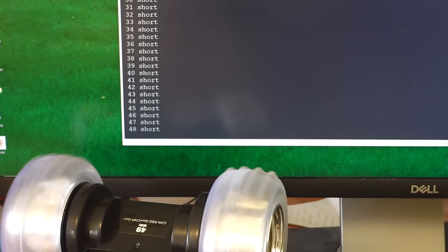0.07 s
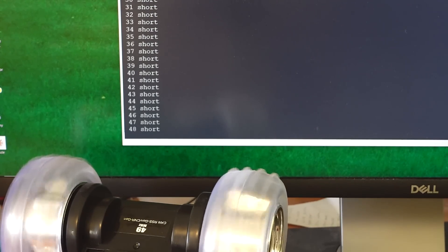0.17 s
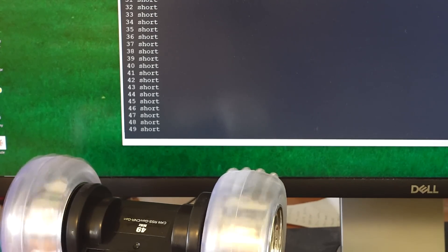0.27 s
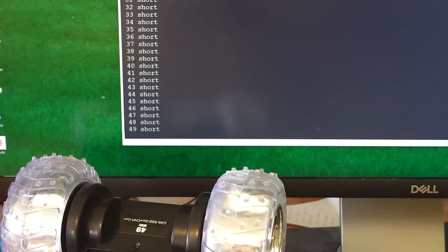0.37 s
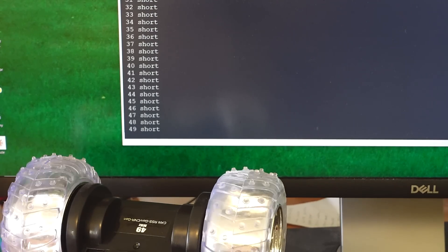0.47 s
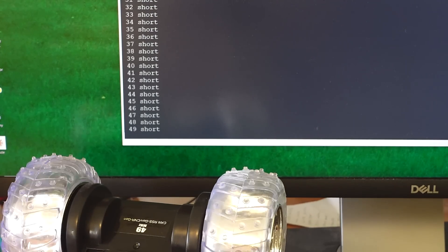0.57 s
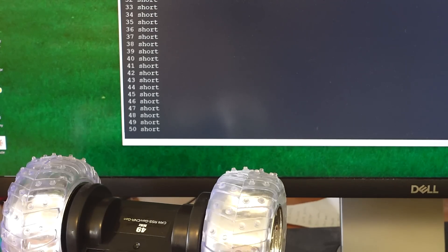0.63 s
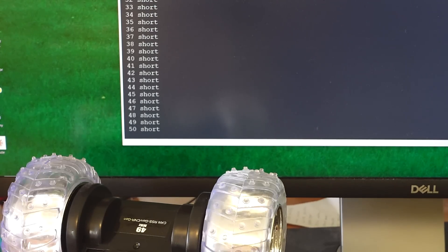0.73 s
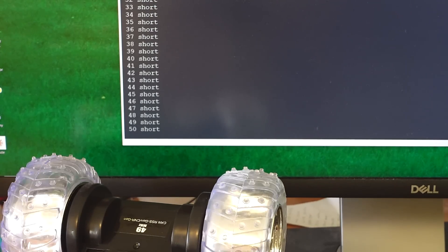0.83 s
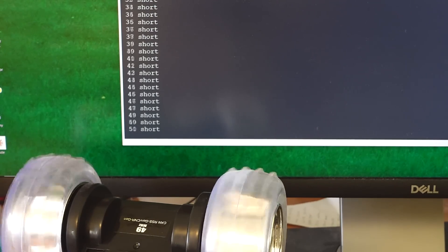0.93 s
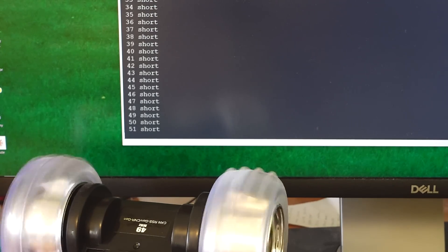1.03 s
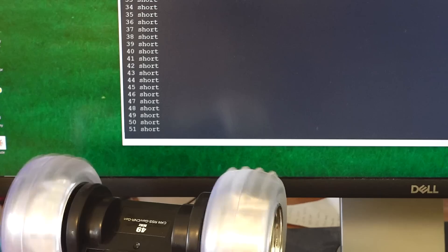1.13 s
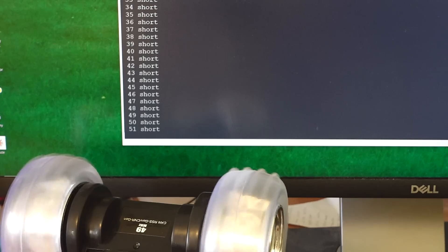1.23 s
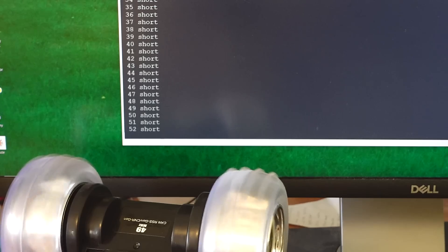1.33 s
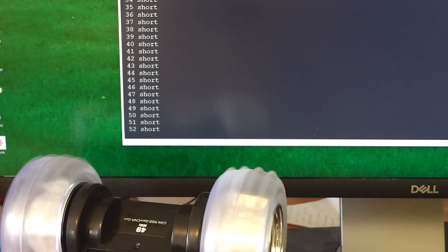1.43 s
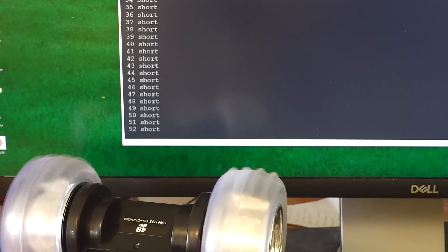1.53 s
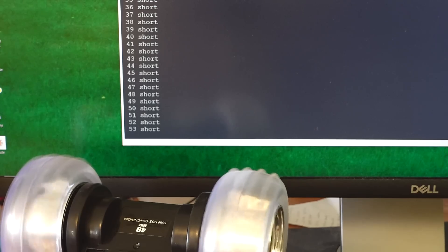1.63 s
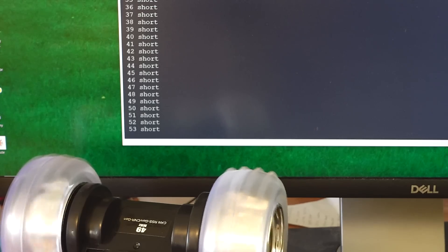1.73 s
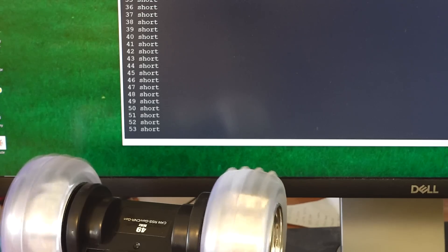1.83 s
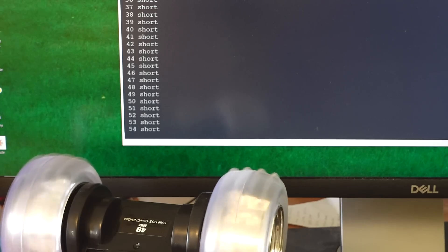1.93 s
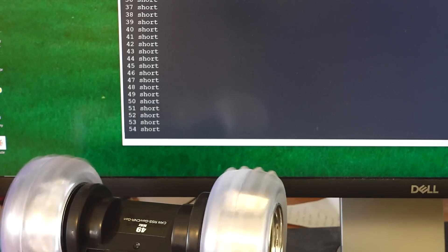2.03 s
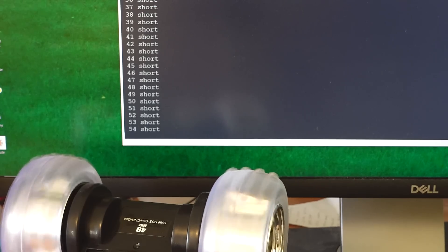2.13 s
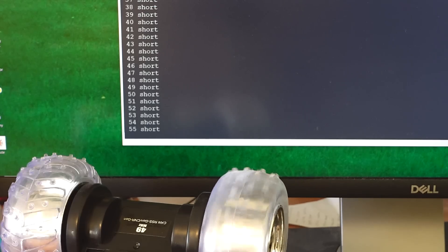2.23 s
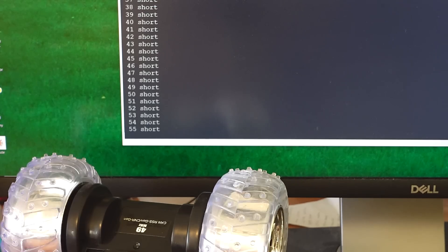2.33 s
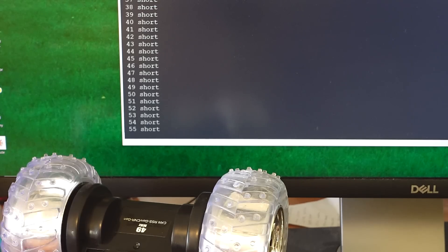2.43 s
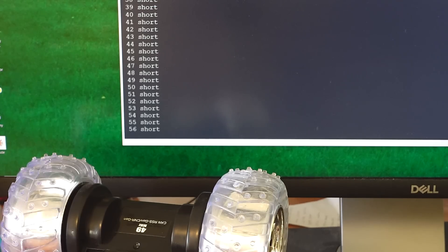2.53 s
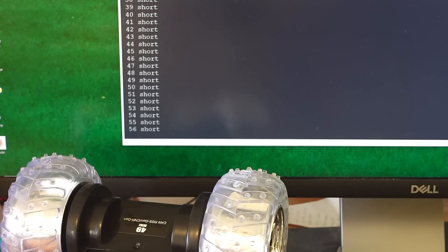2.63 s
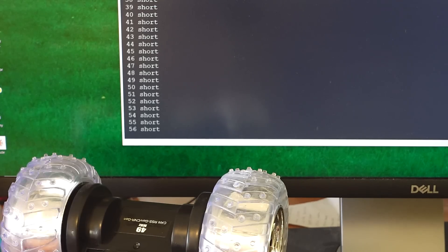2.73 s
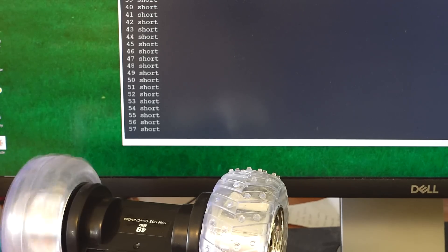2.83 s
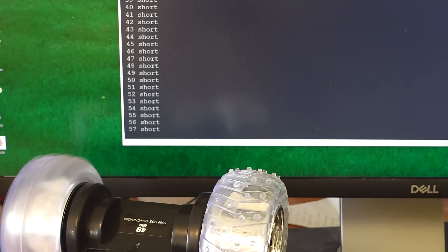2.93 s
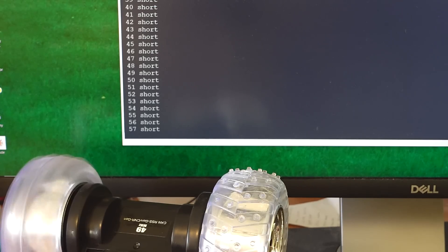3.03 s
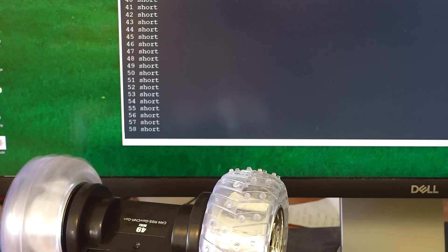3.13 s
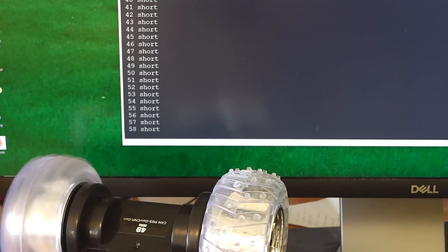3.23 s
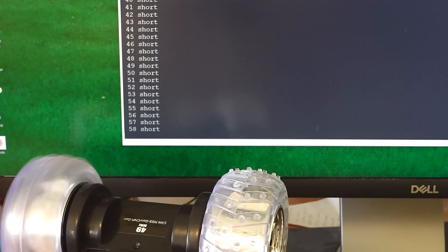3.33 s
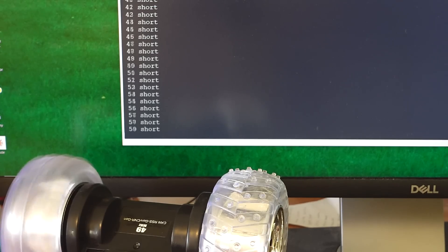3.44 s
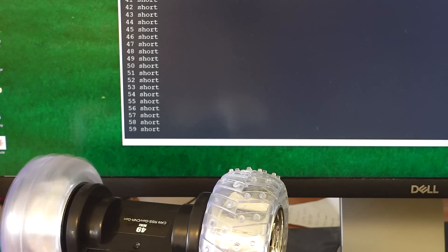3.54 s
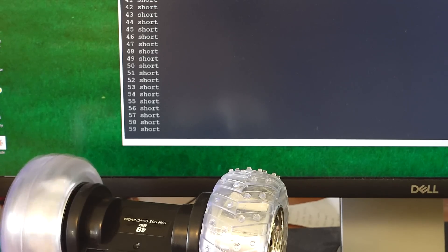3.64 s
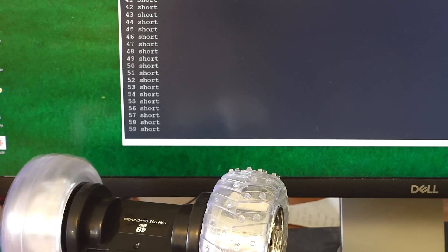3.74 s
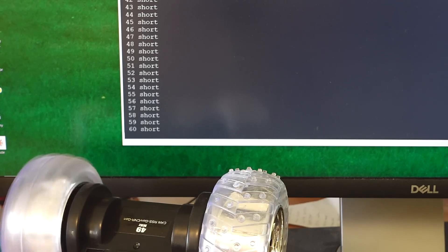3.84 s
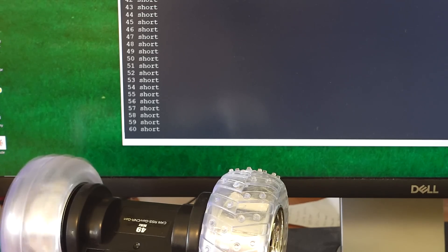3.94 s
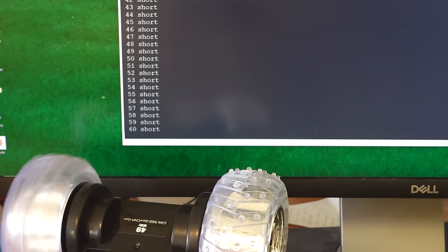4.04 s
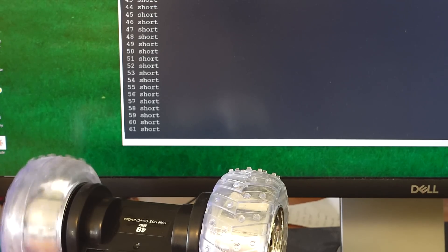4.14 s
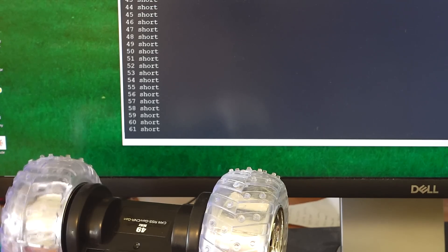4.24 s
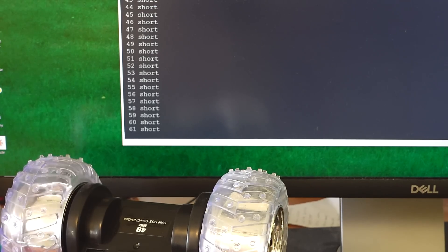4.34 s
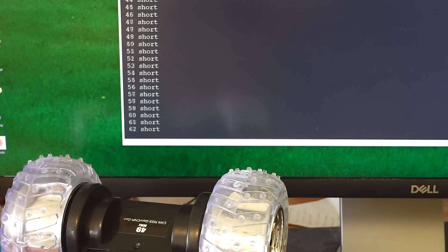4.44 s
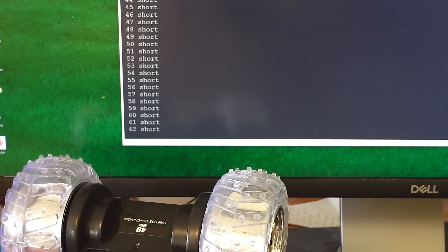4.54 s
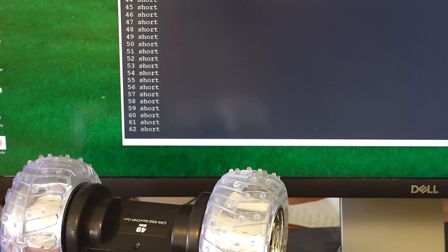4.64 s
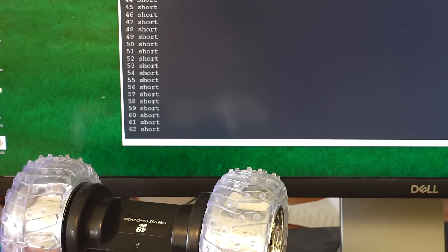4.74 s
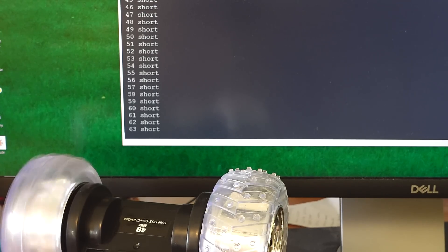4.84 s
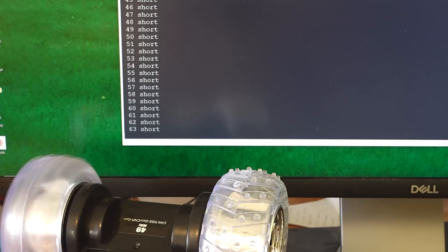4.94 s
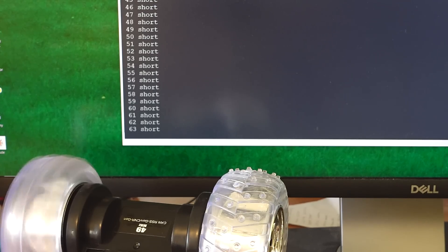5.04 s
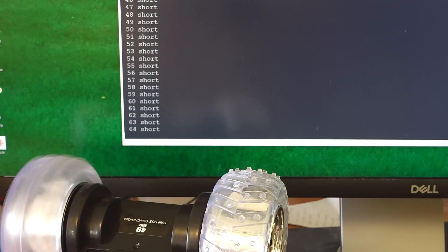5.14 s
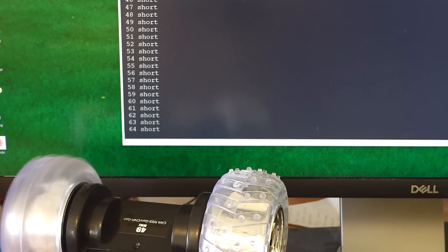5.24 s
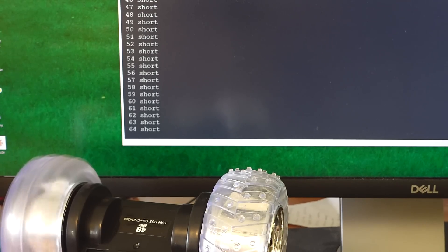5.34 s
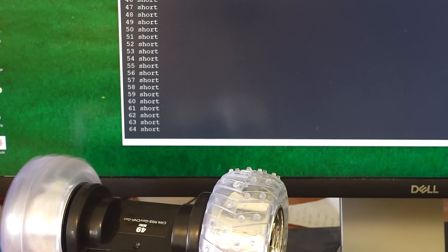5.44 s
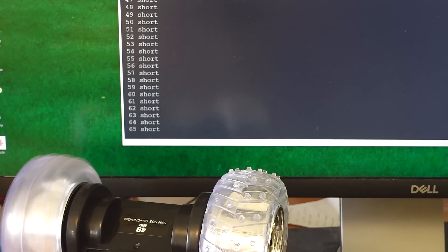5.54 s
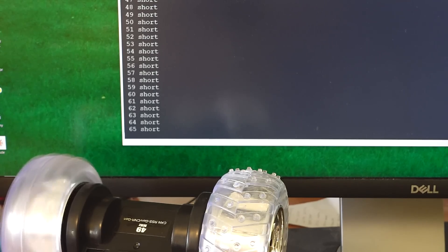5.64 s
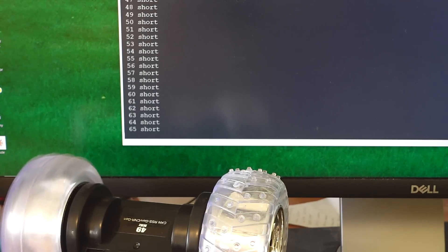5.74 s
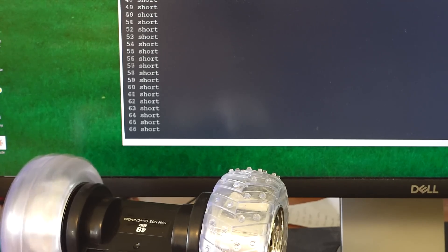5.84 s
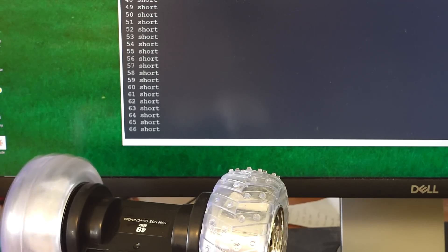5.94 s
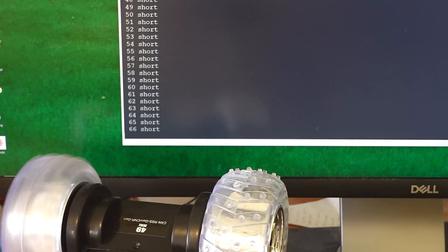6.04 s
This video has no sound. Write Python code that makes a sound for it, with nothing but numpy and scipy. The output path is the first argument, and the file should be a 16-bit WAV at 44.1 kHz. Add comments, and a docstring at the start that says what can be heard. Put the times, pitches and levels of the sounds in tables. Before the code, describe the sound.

Close by, a toy car spins its wheels in one-second bursts, with a motor whine, chattering plastic gears and brief pauses.

```python
"""A toy car, held off the ground close by in a small quiet room, spins its wheels in short runs.
It opens with both front wheels coasting to rest and the gears clicking as they take up their slack.
Near 1 s both wheels spin up again: tooth impacts ring the plastic shell, the motor adds hum and whine.
Near 2.8 s and again at 4.8 s only one wheel turns, and the loose gears chatter harder.
Each run coasts to a stop; the last is still winding down at the end."""
import sys
import numpy as np
from scipy import signal
from scipy.fft import rfft, irfft, next_fast_len
from scipy.io import wavfile
from scipy.ndimage import uniform_filter1d, map_coordinates

SR = 44100
rng = np.random.default_rng(int(sys.argv[2]) if len(sys.argv) > 2 else 0)


def dump(signal):
    """Clip the signal to [-1, 1] and save it as 16-bit WAV at the path in sys.argv[1]."""
    limited = np.clip(np.atleast_2d(signal).T, -1, 1)
    pcm = np.round(limited * 32767).astype(np.int16)
    wavfile.write(sys.argv[1], SR, pcm)


N = 268480

# Cue sheet of the motor runs; levels are trims: (power on [s], power off [s], coast [s],
# top speed [turns/s], grind [dB], grind fall per halving of speed [dB], grind change at full pull [dB],
# chatter [dB], chassis boom [dB], pole tone [dB], whine [dB], wheels driven [count])
MOTOR_RUNS = [(-1.1, .04, .4, 168, -19.6, 9.3, 0, -25, -54, -54, -28, 2),
              (.957, 1.865, .485, 233, -14.8, 9.6, -4, -23, -55, -57, -24.5, 2),
              (2.82, 3.82, .46, 209, -19.2, 12.7, 3.5, -16.5, -45, -57, -47, 1),
              (4.8, 5.86, .58, 211, -19.2, 11, 3.5, -18, -46, -42, -39, 1)]
def run_cues(lead_s=.1):
    """The current run's settings, sample by sample; each takes over just before its power comes on."""
    runs = np.array(MOTOR_RUNS)
    current = np.searchsorted(runs[1:, 0] - lead_s, np.arange(N) / SR)
    return runs[current].T


def shaft_speed(on, off, coast, top, surge_s=.07, creep_s=.32, creep_share=.28):
    """Under power the motor surges, then creeps towards top speed; friction brakes it almost evenly."""
    t = np.arange(N) / SR
    powered = np.clip(np.minimum(t, off) - on, 0, None)
    surge = (1 - creep_share) * np.exp(-powered / surge_s)
    creep = creep_share * np.exp(-powered / creep_s)
    wind_down = np.clip(1 - (t - off) / coast, 0, 1) ** 1.05
    return top * (1 - surge - creep) * wind_down


def teeth(speed, turns, two_wheels, pull, hits_per_turn=14, slide=.77):
    """Gear teeth knock and slide; the load swings once a turn, deeper while the motor pulls."""
    contact = unit(impacts(hits_per_turn * speed, scatter_db=1.5) + slide * rng.standard_normal(N))
    swing_db = (.87 + 2 * pull) * np.sin(2 * np.pi * turns)
    flutter_db = (1.28 + .68 * two_wheels) * wobble(110)
    return unit(contact * amp(swing_db + flutter_db))


def grind_envelope(speed, pull, on, level_db, fall_db, pull_db, knee_hz=160, engage_s=.04):
    """The teeth come under load and swell with speed up to a knee; the pull lifts or ducks them."""
    halvings = np.log2(above(speed, knee_hz, steepness=5) + 1e-20) / 5
    engaged = 1 - np.exp(-np.clip(np.arange(N) / SR - on, 0, None) / engage_s)
    return engaged * amp(level_db + fall_db * halvings + pull_db * pull)


def chatter(speed, turns, chatter_db, gear_ratio=5.3, settle_hz=135, jitter_s=.003, scatter_db=1.2):
    """The loose gear rattles once per turn of its own, softer as it slows: (time [s], level [dB])."""
    at = np.flatnonzero(np.diff(np.floor(turns / gear_ratio)))
    late, size = rng.standard_normal((len(at), 2)).T
    fade_db = 20 * np.log10(above(speed[at], settle_hz, steepness=4.5) + 1e-9)
    times = np.abs(at / SR + jitter_s * late)
    return np.column_stack([times, chatter_db[at] + fade_db + scatter_db * size])


# Accents, the loose gear's hardest rattles: (time [s], relative level [dB])
RATTLE_ACCENTS = [(0.0124, -7), (0.0584, -5), (0.1744, -12), (0.2633, -17), (1.9124, -4), (3.055, -6),
                  (3.0799, -4), (3.1124, -6), (3.1318, -4), (3.1604, -5), (3.1877, -4), (3.2166, -5),
                  (3.2331, -3), (3.2839, -5), (3.3234, -5), (3.3438, -4), (3.4214, -4), (3.4645, -8),
                  (3.4965, -5), (3.6052, -3), (3.679, -4), (3.698, -3), (3.7274, -4), (3.7884, -5),
                  (3.8786, -7), (3.8914, -8), (3.9235, -10), (3.9639, -7), (4.0208, -8), (4.0692, -11),
                  (4.0886, -13), (4.9801, -6), (5.1223, -6), (5.1394, -6), (5.1612, -5), (5.1886, -5),
                  (5.225, -5), (5.3423, -4), (5.4006, -4), (5.4281, -4), (5.4904, -3), (5.5184, -5),
                  (5.5814, -6), (5.6246, -4), (5.6855, -4), (5.7354, -4), (5.7904, -4), (6.0054, -10)]
# Hard blows ring the stiff gearbox walls more and the bass less: (frequency [Hz], gain [dB])
RATTLE_EQ = [(300, -11), (800, -9.5), (1300, -8), (1900, 0.5), (2500, 2), (3300, -4), (3650, -1),
             (4000, 3.5), (4600, -4), (6100, 2.5), (7500, -2), (9400, -1.5), (12000, -3)]
def rattles(light, rise_s=.0021, fall_s=.0032, accent_db=-9.6, delay_s=.0018, rebound_s=.015):
    """Each rattle is a brief flurry of blows with its own colour; accents replace nearby light ones."""
    force = np.zeros(N + SR)
    t = np.arange(-SR // 40, SR // 40) / SR - delay_s
    hz = np.fft.rfftfreq(len(t), 1 / SR)
    envelope = np.exp(-(t / np.where(t < 0, rise_s, fall_s)) ** 2 / 4)
    accents = np.array(RATTLE_ACCENTS) + [0, accent_db]
    clear = np.abs(light[:, :1] - accents[:, 0]).min(axis=1) > rebound_s
    blows = np.pad(impacts(6000, scatter_db=1), (0, SR))
    for time, db in np.vstack([accents, light[clear]]):
        eq = RATTLE_EQ + np.outer(rng.standard_normal(len(RATTLE_EQ)), [0, 1.5])  # 1.5 dB scatter
        start = round(time * SR)
        flurry = envelope * blows[start:][:len(t)]
        force[start:][:len(t)] += irfft(rfft(flurry) * amp(db + along(eq, hz)), len(t))
    return force[len(t) // 2:][:N]


# Bite of the teeth while the motor strains to gain speed: (frequency [Hz], gain [dB])
PULL_EQ = [(500, -0.5), (1500, 0), (2600, 3.5), (3800, -4), (4800, -1.5), (6000, 1.5), (7500, -6),
           (11000, -5.5)]
# Darker tone of soft contacts at low speed: (frequency [Hz], gain [dB])
SOFT_EQ = [(150, 7.5), (300, 9.5), (500, 6.5), (730, 3), (1000, 5.5), (1400, 1), (2000, 1), (2800, -0.5),
           (4000, -2.5), (5500, -0.5), (8000, -8), (12000, -7)]
def contact_tone(force, speed, pull, soft_below_hz=134, hardening=.6):
    """Slow teeth meet softly; the motor's pull hardens the contact again."""
    softness = (1 - hardening * pull) / (1 + (speed / soft_below_hz) ** 5)
    strained = (1 - pull) * force + pull * equalised(force, PULL_EQ)
    return (1 - softness) * strained + softness * equalised(strained, SOFT_EQ)


# Gears take up slack at starts and tick as they creep to a stop: (time [s], relative level [dB])
SLACK_CLICKS = [(.396, -11.5), (0.449, -27.5), (0.957, -32), (2.825, -20), (2.855, -18.5), (2.884, -9),
                (4.203, -25), (4.226, -26.5), (4.268, -30), (4.315, -37), (4.362, -29), (4.807, -23.5)]
# The plastic knock of each click: (frequency [Hz], gain [dB])
KNOCK_EQ = [(200, 9), (700, 5), (1500, 3), (2700, 0), (4000, -5), (5400, 3), (7500, -10), (11000, -8),
            (14000, -3)]
def clicks(t60=.036, scrape=.34, trim_db=-2):
    """One sharp blow and a brief scrape as the teeth settle."""
    force = np.zeros(N + SR)
    t = np.arange(SR // 20) / SR
    for time, db in SLACK_CLICKS:
        blow = (t == 0) + scrape * amp(-60 * t / t60) * rng.standard_normal(len(t))
        force[round(time * SR):][:len(t)] += amp(db + trim_db) * blow
    return equalised(force[:N], KNOCK_EQ)


# Shell resonances: (frequency [Hz], width [Hz], boost with two wheels [dB], boost with one wheel [dB])
SHELL_MODES = [(237, 31, 5.5, 5.5), (308, 20, -2, 1.5), (365, 50, 7, 1), (607, 27, 6, 9.5),
               (735, 72, 14, 11.5), (924, 82, 12.5, 6.5), (1024, 75, 9, 12.5), (1148, 50, 6, 8),
               (1340, 97, 6.5, 12.5), (1417, 81, 7.5, 10), (1587, 130, 9.5, 11.5), (1909, 174, 9, 11),
               (2130, 90, 5.5, 0), (2282, 166, 4.5, 7.5), (2571, 323, 9.5, 4), (2798, 350, 9.5, 5.5),
               (3648, 340, 10, 2.5), (3970, 340, 10, 11.3), (4415, 59, 7, 4.5), (4815, 140, 7.5, 2),
               (5423, 320, 7.5, 4.5), (6140, 260, 5.5, 7.5), (6510, 810, 9, -2), (6990, 320, 4.5, 2.5),
               (7530, 84, 4, 5), (9230, 410, -1.5, 5.5)]
# Tone of the tooth impacts with two wheels and with one driven: (frequency [Hz], relative gain [dB])
TWO_WHEEL_EQ = [(60, -32), (130, -23), (200, -15), (480, -11.5), (900, -7), (1350, -0.5), (2100, -1.1),
                (2800, -1.7), (3400, -1), (5000, -1), (6500, -4.5), (9500, -2.8), (12500, -15),
                (15000, -22.5)]
ONE_WHEEL_EQ = [(60, -32), (130, -27.5), (200, -14), (480, -13.7), (900, -7.3), (1350, -10), (2100, -2.3),
                (2800, -0.3), (3400, -2.5), (5000, -4.5), (6500, -3), (9500, -7.8), (12500, -18),
                (15000, -28.5)]
def shell(force, two_wheels, size=8192):
    """Gear forces ring the plastic shell, voiced differently for two driven wheels and for one."""
    hz = np.fft.rfftfreq(size, 1 / SR)
    centres, widths, two_db, one_db = np.transpose(SHELL_MODES)
    peaks = resonance(hz[:, None], centres, widths)
    body = np.zeros(N)
    for share, eq, boosts in (two_wheels, TWO_WHEEL_EQ, two_db), (1 - two_wheels, ONE_WHEEL_EQ, one_db):
        cepstrum = irfft(np.log(amp(along(eq, hz) + peaks @ boosts)))
        cepstrum[1:size // 2] *= 2  # minimum phase: the ring follows the hit
        cepstrum[size // 2 + 1:] = 0
        ring = irfft(np.exp(rfft(cepstrum)))
        body += convolved(share * force, ring)
    return body


def shaft_tone(turns, order, slip_rad, slip_hz, flutter_db):
    """One multiple of the shaft speed; play in the bearings blurs its phase and level."""
    phase = 2 * np.pi * order * turns + slip_rad * wobble(slip_hz)
    return unit(np.sin(phase) * amp(flutter_db * wobble(35)))


def motor(speed, turns, pull, boom_db, pole_db, whine_db, duck_db=-8, fade_below_hz=148):
    """Shaft unbalance booms in the chassis; three rotor poles and the gear whine sing at speed."""
    boom = amp(boom_db) * resonance(speed, centre_hz=204, width_hz=24)
    hum = boom * shaft_tone(turns, order=1, slip_rad=.25, slip_hz=25, flutter_db=1.5)
    poles = amp(pole_db) * shaft_tone(turns, order=3, slip_rad=.85, slip_hz=80, flutter_db=3)
    whine = shaft_tone(turns, order=6, slip_rad=1.5, slip_hz=140, flutter_db=3.5)
    whine *= amp(whine_db + duck_db * pull)  # the pull presses the teeth together
    return above(speed, fade_below_hz, steepness=11) * (hum + poles + whine)


# Stereo width of the early echoes: (frequency [Hz], side against mid [dB])
ECHO_WIDTH = [(60, -10), (150, -37), (300, -25.5), (700, -27), (1200, -21), (2500, -15), (6000, -13),
              (9000, -12.5), (12000, -28)]
def desk_echoes(x, t60=.09):
    """Early echoes, scattered by the desk, reach the two microphone ports differently."""
    t = np.arange(SR // 10) / SR
    echoes = rng.standard_normal(len(t)) * amp(-60 * t / t60) * (t > .001)
    side = equalised(convolved(x, echoes), ECHO_WIDTH)
    return np.array([x + side, x - side])


# Reverb of the small room: (frequency [Hz], time to fall 60 dB [s])
ROOM_DECAY = [(200, 0.51), (2000, 0.21), (10000, 0.14)]
def room(x, predelay=SR // 200):
    """A diffuse tail whose highs die first."""
    hz, t, noise = signal.stft(rng.standard_normal(SR // 2), SR, nperseg=256)
    decay = amp(-60 * t / along(ROOM_DECAY, hz)[:, None])
    tail = signal.istft(noise * decay, SR, nperseg=256)[1]
    return convolved(np.pad(x, (predelay, 0)), tail)


# Colour of the room tone: (frequency [Hz], relative gain [dB])
ROOM_TONE_EQ = [(18, -79.5), (30, -44.5), (95, -19), (148, -7), (177, -11), (197, -4.5), (410, -7),
                (467, -3.5), (546, -7), (1510, -8.5), (4190, -17), (12300, -23.5), (15500, -20)]
# Fader ride of the room tone: (time [s], level [dB])
ROOM_TONE_RIDE = [(.5, -59), (.8, -61), (2.4, -56.5), (2.7, -58.5), (4.4, -57), (4.7, -58.5)]
def room_tone(side_db=-12, whistle_db=-81, whistle_hz=14433):
    """A soft bed of room noise with a faint electronic whistle."""
    t = np.arange(N) / SR
    mid, side = unit(equalised(rng.standard_normal((2, N)), ROOM_TONE_EQ))
    air = np.array([mid + amp(side_db) * side, mid - amp(side_db) * side])
    fader = amp(np.interp(t, *np.transpose(ROOM_TONE_RIDE)))
    return fader * air + amp(whistle_db) * np.sin(2 * np.pi * whistle_hz * t)


def amp(db):
    """Decibels to gain."""
    return 10 ** (np.asarray(db) / 20)


def unit(x):
    """Scale to rms 1."""
    return x / np.sqrt(np.mean(x ** 2) + 1e-20)


def along(points, hz):
    """Read (frequency [Hz], value) points on a log axis."""
    knots, values = np.transpose(points)
    return np.interp(np.log(hz + 1), np.log(knots + 1), values)


def above(speed, knee, steepness):
    """A soft gate: near 1 above the knee, falling as a power of speed below it."""
    ratio = (speed / knee) ** steepness
    return ratio / (1 + ratio)


def resonance(hz, centre_hz, width_hz):
    """A bell curve of height 1."""
    return 1 / (1 + (2 * (hz - centre_hz) / width_hz) ** 2)


def wobble(rate):
    """A smooth random curve, rate knots a second."""
    return map_coordinates(rng.standard_normal(int(N * rate / SR) + 4), [np.arange(N) * rate / SR])


def impacts(rate, scatter_db):
    """A crackle of tiny uneven blows, rate a second, at rms 1."""
    chance = np.clip(rate / SR, 1e-4, 1)
    hits = (rng.random(N) < chance) * rng.choice([-1, 1], N) / np.sqrt(chance)
    return unit(hits * amp(scatter_db * np.clip(rng.standard_normal(N), -2, 2)))


def filtered(x, response):
    """Shape x by a gain that depends on frequency."""
    size = next_fast_len(N + SR // 2)
    return irfft(rfft(x, size) * response(np.fft.rfftfreq(size, 1 / SR)), size)[..., :N]


def equalised(x, eq):
    """Play x through an EQ curve: (frequency [Hz], gain [dB])."""
    return filtered(x, lambda hz: amp(along(eq, hz)))


def convolved(x, impulse):
    """Play x through an impulse response scaled to unit energy."""
    return signal.fftconvolve(x, impulse / np.linalg.norm(impulse))[:N]


def scene(full_pull_hz_per_s=420):
    """The mix: shaft speed drives the gears and motor tones, up close over light reverb and room tone."""
    on, off, coast, top, grind_db, fall_db, pull_db, chatter_db, *motor_db, wheels = run_cues()
    speed = shaft_speed(on, off, coast, top).clip(0)
    turns = np.cumsum(speed) / SR
    two_wheels = wheels - 1
    acceleration = uniform_filter1d(np.gradient(speed) * SR, SR // 20)
    pull = np.clip(acceleration / full_pull_hz_per_s, 0, 1)
    envelope = grind_envelope(speed, pull, on, grind_db, fall_db, pull_db)
    grind = envelope * teeth(speed, turns, two_wheels, pull)
    loose_gear = rattles(chatter(speed, turns, chatter_db))
    force = contact_tone(grind + loose_gear, speed, pull) + clicks()
    car = shell(force, two_wheels) + motor(speed, turns, pull, *motor_db)
    near = desk_echoes(car + amp(-12.5) * room(car)) * amp([[-.2], [.2]])  # a touch to the right
    wide_reverb = amp(-18) * np.array([room(car), room(car)])
    return near + wide_reverb + room_tone()


def record(dry, ceiling=.85, low_hz=52, top_hz=15700):
    """The highest peaks are rounded off; the microphone drops the deep bass and the very top."""
    rounded = dry / (1 + np.abs(dry / ceiling) ** 6) ** (1 / 6)
    return filtered(rounded, lambda hz: hz ** 2 / (hz ** 2 + low_hz ** 2) * (hz < top_hz))


dry = scene()
out = record(dry)
dump(out)
```